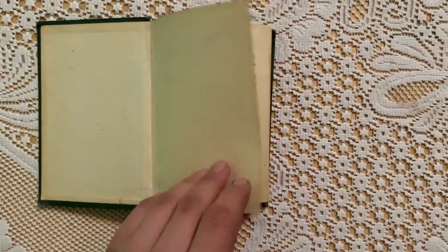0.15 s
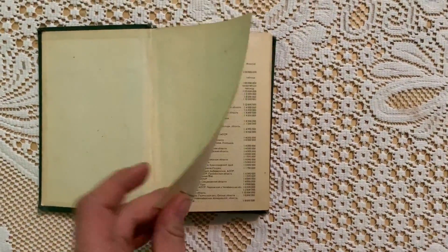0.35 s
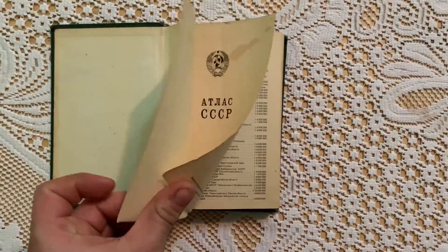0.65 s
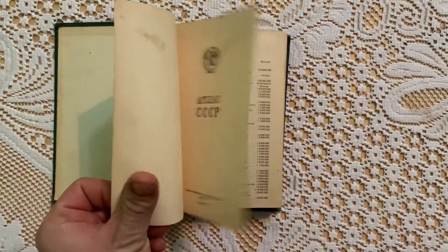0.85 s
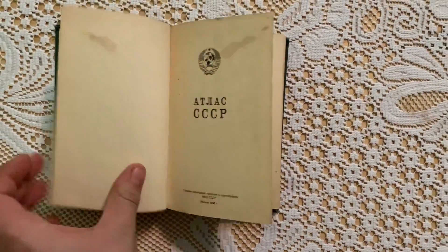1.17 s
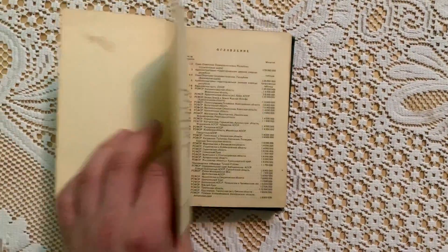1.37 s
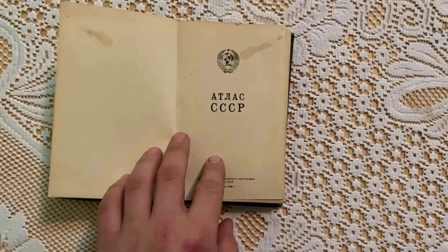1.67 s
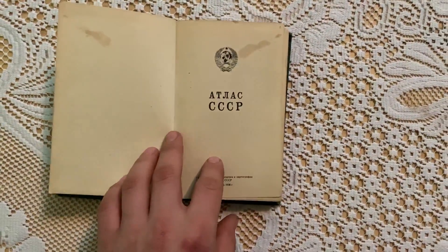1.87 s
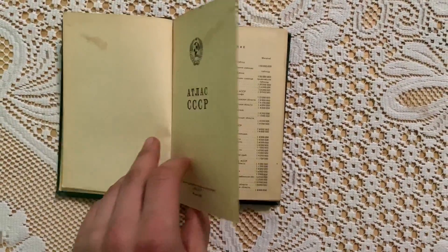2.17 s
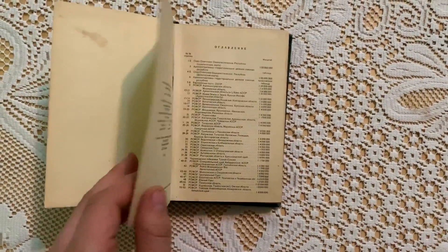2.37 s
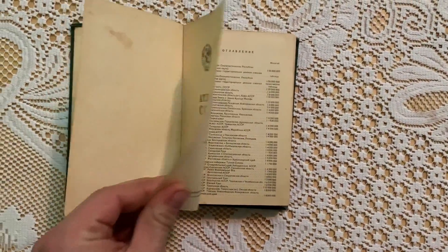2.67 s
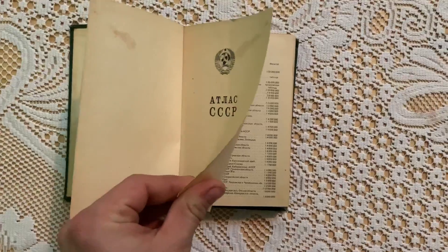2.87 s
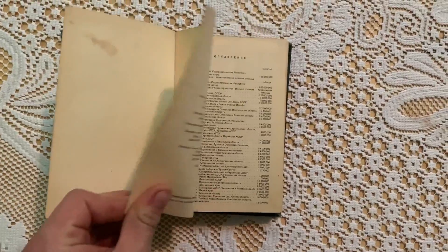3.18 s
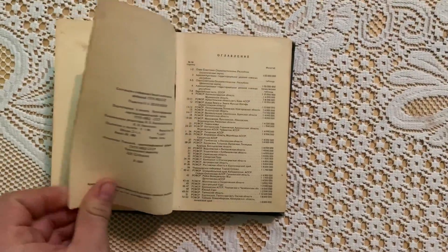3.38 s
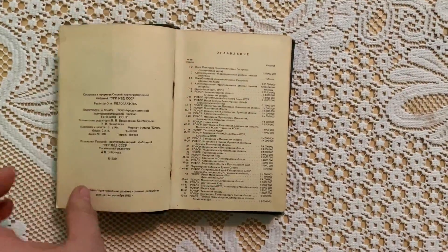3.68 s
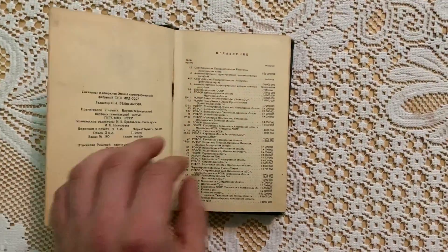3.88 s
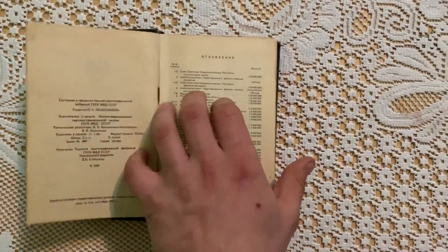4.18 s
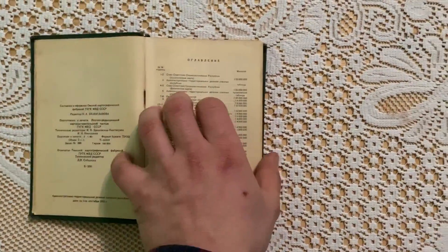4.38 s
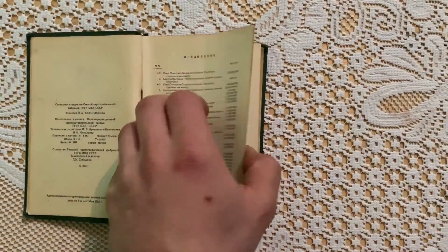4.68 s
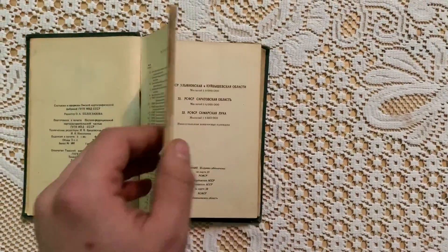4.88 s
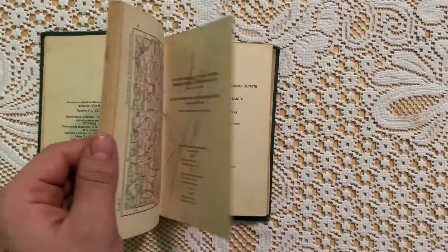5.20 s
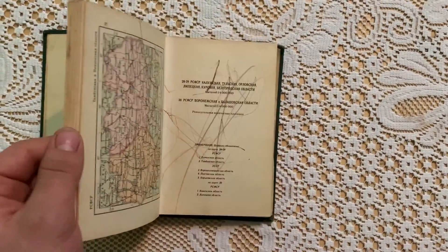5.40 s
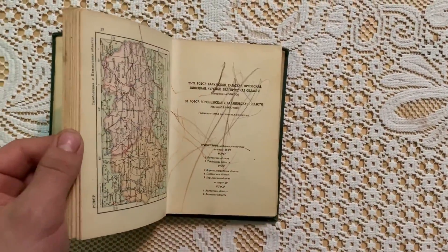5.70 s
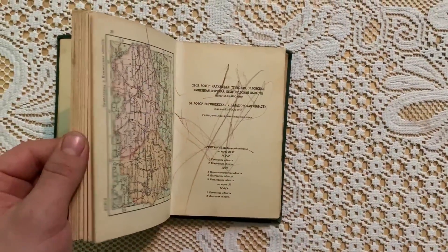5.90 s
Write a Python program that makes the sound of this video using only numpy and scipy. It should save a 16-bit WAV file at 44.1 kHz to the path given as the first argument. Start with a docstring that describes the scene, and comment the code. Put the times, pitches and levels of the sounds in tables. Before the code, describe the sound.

Stiff paper pages are turned by hand, heard through a close stereo microphone. Grainy sliding and hollow bending lead to sharp snaps around one and a half seconds, then a spaced run of crisp flicks near three. Soft bumps of the book on cloth sit underneath. The later part is nearly still, until thick pages flop over with a soft breathy thump and rustle. Short room reflections, faint low room air.

```python
"""A small room, a cloth-covered table: a hand turns the stiff pages of an old book close to a two-port microphone.
Sheets slide with a dry hiss of grainy noise, bend with a hollow crumple of small buckles and a ring of page modes,
and snap in short pulses with a flutter, a thud and a scrape. Sliding edges sing, creases crackle, the book bumps
on the cloth. At the end a bunch of pages fans over and pushes a puff of air at the microphone.
Around it lie sparse wall reflections and a faint bed of filtered noise, the air of the room."""
import sys
import numpy as np
from scipy import signal
from scipy.fft import rfft, irfft
from scipy.io import wavfile

SR = 44100
rng = np.random.default_rng(int(sys.argv[2]) if len(sys.argv) > 2 else 0)


def store_pcm(level_fs):
    """Save levels as 16-bit WAV."""
    pcm = np.round(np.clip(level_fs, -1, 1) * 32767).astype(np.int16)
    wavfile.write(sys.argv[1], SR, np.atleast_2d(pcm).T)


N = 266805
TIME = np.arange(N) / SR

# Event levels are relative: each layer is mixed with a gain of its own.
# Strokes of a sheet sliding on sheet or skin: first page, second page, then a bunch of pages lifted:
# (start [s], time to reach full speed [s], time it runs on [s], rub level [dB], fibre fizz level [dB])
SLIDES = [ (0.112, 0.0061, 0.0058, -53, -55), (0.255, 0.026, 0.011, -47, -43.5),
          (0.39, .04, 0.18, -58, -67.5), (0.473, 0.17, 0.062, -39.5, -40.5), (0.69, 0.23, .065, -46.5, -46),
          (0.91, 0.031, 0.018, -40, -44), (1.022, 0.023, 0.17, -51, -49.5),
          (1.235, 0.038, 0.012, -54.5, -48), (1.356, 0.16, 0.021, -50.5, -45.5),
          (1.485, 0.048, 0.059, -33, -56), (1.58, 0.069, 0.051, -49.5, -85),
          (1.909, 0.092, 0.078, -56, -59.5), (2.16, 0.085, 0.16, -61.5, -57.5),
          (2.35, 0.13, 0.048, -62, -55.5), (2.56, 0.056, 0.028, -48.5, -52.5),
          (2.66, 0.038, 0.69, -55, -59), (2.991, 0.019, 0.058, -50.5, -84), (3.119, 0.17, 0.31, -53.5, -62),
          (3.437, 0.013, 0.057, -49, -43.5), (3.5, 0.044, 0.084, -52.5, -53.5),
          (3.619, 0.013, 0.069, -49.5, -42), (3.814, 0.059, 0.0054, -56.5, -55.5),
          (3.951, 0.013, 0.0061, -57.5, -59.5), (4.06, 0.19, 0.065, -59, -67),
          (4.274, 0.052, 0.034, -56, -58.5), (4.656, 0.004, 0.058, -56.5, -57.5),
          (4.721, 0.083, 0.071, -60.5, -60.5), (4.87, 0.05, 0.19, -66, -70),
          (5.181, 0.047, 0.0049, -57.5, -56.5)]
# Paper snaps and taps: corner caught, buckle over the spine, slap flat, edge slipping off the thumb, crackle, grip:
# (time [s], crack level [dB], thud level [dB], edge scrape level [dB],
#  share of the crack in its first pulse [0-1], nominal centre of the crack [Hz])
SNAPS = [ (0.076, -25.5, -29.5, -24.5, 0.75, 1620), (0.249, -17.5, -26, -28.5, 0.45, 1140),
         (0.263, -15.5, -19, -26, 0.8, 1410), (0.2748, -13.5, -17, -24, 0.6, 1780),
         (0.319, -8, -20.5, -51, 0.46, 1480), (0.9462, -11, -16.5, -5, 0.3, 1940),
         (0.9535, -5, -38, -32, 0.4, 1420), (1.299, -18, -33.5, -26, 0.3, 1200),
         (1.4675, -9, -39.5, -23, 0.1, 1500), (1.482, -8, -27.5, -27, 0.16, 1550),
         (1.495, -10, -17, -26, 0.1, 1550), (1.5197, -11, -10.5, -13, 0.8, 1638),
         (1.5295, 1.5, -24, -33, 0.7, 2200), (1.5318, 5.5, -4, -6, 0.3, 2040),
         (1.5464, -0.5, -11.5, -18, 0.8, 1601), (1.5578, -9, -11, -24, 0.6, 1530),
         (1.5763, 1.5, -22, -37, 0.92, 1930), (1.6617, -16, -22.5, -60, 0.73, 1424),
         (2.18, -28.5, -34, -32.5, 0.67, 1680), (2.6563, -21.5, -24, -18.5, 0, 2550),
         (2.702, -11.5, -15.5, -12, 0.9, 1930), (2.7357, -8, -19, -7, 1, 2010),
         (2.7794, -10, -18, -9, 1, 1840), (2.8317, -4.5, -18.5, -8.5, 0.91, 2300),
         (2.889, -9, -22.5, -15, 0.78, 2330), (2.9974, 1.5, -15.5, -11, 0.95, 2200),
         (3.2013, -13, -37, -17.5, 0.35, 2700), (3.2367, -16.5, -25, -16.5, 0.3, 2500),
         (3.2663, -21, -26, -23, 0.4, 2520), (3.3081, -16.5, -21.5, -16, 0.5, 2610),
         (3.339, -12, -20, -11, 0.15, 2320), (3.3794, -16.5, -27.5, -40, 0.4, 1240),
         (3.4424, -22.5, -46, -19, 0.2, 2210), (3.8271, -29, -39, -55.5, 0, 1600),
         (4.2179, -24.5, -23, -25.5, 0.65, 1444), (4.2526, -25, -16, -56, 0.4, 1024),
         (4.5706, -33, -27, -40, 0.1, 1095), (4.659, -29.5, -38, -31.5, 0.47, 1300),
         (5.3173, -30.5, -42, -35, 0.07, 1695)]
# A sheet flexes as it is lifted or laid down: (start [s], length [s], level [dB])
BENDS = [(0.064, 0.072, -55.5), (0.228, 0.045, -45), (0.326, 0.41, -57.5), (0.93, 0.033, -34.5),
         (0.969, 0.065, -34), (1.007, 0.34, -49), (1.283, 0.05, -38), (1.448, .14, -33.5), (2.2, 0.19, -59),
         (2.588, 0.023, -48.5), (2.718, 0.3, -46), (3, 0.11, -48), (3.23, 0.58, -57.5), (3.345, 0.031, -49),
         (3.85, 0.016, -49.5), (4.218, 0.076, -50), (4.308, 0.018, -52)]
# Stiff paper crinkles while it is curled: (start [s], length [s], level [dB])
CRINKLES = [(0.581, 0.37, -58.5), (1.481, 0.081, -40.5), (2.627, 0.26, -54), (3.19, 0.14, -50.5),
            (3.424, 0.23, -56.5)]
# A sliding edge or fingertip sings in the gap under the sheet, which opens or closes:
# (start [s], length [s], from [Hz], to [Hz], level [dB])
SINGS = [(0.116, 0.017, 1640, 1630, -43), (0.49, 0.084, 7900, 6660, -51.5),
         (0.539, 0.13, 1840, 2380, -43.5), (0.708, 0.27, 7700, 7400, -50), (2.204, 0.033, 970, 875, -58),
         (2.277, 0.16, 497, 217, -60.5), (2.442, 0.41, 2240, 2830, -57.5), (3.38, 0.11, 900, 740, -65),
         (3.683, 0.048, 1250, 1780, -47.5), (3.863, 0.036, 1210, 1510, -57), (4.663, 0.29, 3280, 3940, -64),
         (4.857, 0.57, 6300, 7140, -68), (4.867, 0.065, 300, 357, -61.5), (5.017, 0.37, 2730, 2410, -67.5),
         (5.197, 0.05, 2310, 1790, -62), (5.331, 0.34, 2130, 2100, -70.5), (5.4, 0.25, 240, 401, -65)]
# Pages fanning over: (time [s], air push level [dB], swish level [dB])
FAN = [(5.82, -74, -97), (5.888, -51.5, -82), (5.954, -38, -37.5), (6.05, -45, -34)]
# The hand shifts the book on the cloth: (start [s], length [s], level [dB])
SHOVES = [(0.95, 0.2, -57), (1.293, 0.13, -57.5), (1.464, 0.05, -49.5), (2.626, 0.32, -53),
          (2.979, 0.073, -58), (3.162, 0.26, -54), (4.2, 0.23, -58.5)]

# Spectra of the sources, only their shape counts: (frequency [Hz], relative level [dB per Hz])
RUB_COLOUR = [(150, -21), (500, -34.5), (900, -10), (1400, -2.5), (2100, -2.5), (3000, -3.5), (4200, -6),
              (6000, -11), (10000, -46)]
FIZZ_COLOUR = [(2500, -47), (4500, 0.5), (6000, 1), (7400, 4.5), (9000, 2), (11000, 0), (13000, -3),
               (16000, -13)]
CRACK_COLOUR = [(100, -35), (400, -14), (750, -5.5), (1150, 4.5), (1900, 4.5), (2600, 2.5), (3600, -3),
                (4700, -9.5), (6500, -16.5), (15000, -42)]
THUD_COLOUR = [(25, -29), (70, 3), (160, -15.5), (330, -0.5), (600, -5.5), (1000, -11.5), (7000, -70.5)]
SCRAPE_COLOUR = [(2000, -36), (4200, 7.5), (6200, 2), (9000, 2.5), (12500, 5), (16000, -13)]
BEND_COLOUR = [(30, -35), (70, -23), (150, -10), (320, -11.5), (550, -7.5), (1000, 1.5), (1450, -2.5),
               (2000, -6.5), (3300, -25), (6000, -30.5), (14000, -34)]
CRINKLE_COLOUR = [(200, -10.5), (700, 7), (2400, 1.5), (5000, 12), (12000, -2), (16000, -20.5)]
PUFF_COLOUR = [(20, -17), (55, -1), (120, -2.5), (260, -4.5), (400, -17), (600, -15), (1000, -23.5),
               (10000, -72)]
SWISH_COLOUR = [(400, -28), (1300, -6.5), (2100, -2.5), (4300, 1), (5400, -2), (6700, -11), (8500, -18.5),
                (14000, -33)]
HANDLING_COLOUR = [(25, -40.0), (120, 0.5), (230, 4.5), (320, -6.5), (450, -11.0), (650, -12.5),
                   (1000, -41.0), (4000, -68)]
# Spectra of nearby scattering and of the room's air: (frequency [Hz], relative level [dB per Hz])
NEARBY_COLOUR = [(100, -12), (600, -4), (1500, -3), (3300, -2), (4300, -6), (5500, -13), (16000, -15)]
AIR_COLOUR = [(22, -38), (45, 9), (77, -9), (160, -12), (350, -19.5), (750, -46.5), (2200, -40.5),
              (4800, -35.5), (10000, -40.5), (16000, -41.5)]

# Resonances of the arched page: (frequency [Hz], relative level [dB])
PAGE_MODES = [(464, -0.5), (700, 2), (840, 1), (1030, 5), (1240, -13)]
# Steady lines of the rubbing edges of a bunch: (frequency [Hz], relative level [dB])
FAN_MODES = [(2304, -5), (2837, -1), (3219, -5), (3698, -4), (4231, -6), (4743, -6), (5136, -13),
             (6078, -9), (6761, -9), (7671, -14)]
# Resonances of the block of pages: (frequency [Hz], relative level [dB])
THUMP_MODES = [(115, -2.5), (227, -2), (404, -7.5)]

# Decay of the room: (frequency [Hz], time to fall 60 dB [s])
ROOM_DECAY = [(100, 0.36), (400, 0.31), (1500, 0.11), (4000, 0.17), (8000, 0.062), (15000, 0.097)]
# Phase between the two microphone ports: (frequency [Hz], lead of the left port [rad])
PORT_PHASE = [(0, 0), (500, -.15), (2100, -.45), (3050, -2), (3400, -4.2), (3700, -4.7), (4200, -3.8),
              (5100, -3.1), (7700, -.1), (9000, .1), (12100, 3.1), (13300, 3.3), (15500, 6.2)]
# Level between the two microphone ports: (frequency [Hz], left minus right [dB])
PORT_BALANCE = [(40, 2.5), (150, -4.5), (1000, -1.5), (2600, -3.5), (3700, 2), (5000, 1)]

# A movement sags while it runs, then dies away; releases are in s per 20 dB, before the coast is added.
SLIDE_SAG_DB, SLIDE_RELEASE_S = 5, 0.025
BEND_ATTACK_S, BEND_SAG_DB, BEND_RELEASE_S = 0.029, 18.5, 0.12
RING_SAG_DB = 14  # the ring of the page eases off less than its crumple
SHOVE_ATTACK_S, SHOVE_SAG_DB, SHOVE_RELEASE_S = 0.042, 16, 0.09
COAST_SHARE = 0.55  # slow starts stop slowly: this share of the rise is added to the release
TOUCH_RUB_DB, TOUCH_FIZZ_DB = -73.5, -79.5  # fingers resting on the paper
DRAG_FLEX_DB = -22  # a sliding sheet flexes a little too, relative to its rub
HOLD_DB = -70.5  # the hand just holding the book
SING_WIDTH_HZ, SING_WIDTH_SHARE = 200, 0.16  # width of each resonance: a base plus a share of its pitch
AIR_DB = -66
EDGE_HZ = 16000  # upper band limit


def sliding():
    """The same fibre slips sound the sheet as a rub and the fibres as a fizz."""
    rub_level, fizz_level = slide_levels()
    slips = friction(per_s=1500, spread_db=3.2, grainy=0.75) * waver(rate_hz=45, depth_db=1.7)
    rub = gain_of(-0.5) * colour(slips * rub_level, RUB_COLOUR)
    fizz = gain_of(-0.2) * colour(slips * fizz_level, FIZZ_COLOUR)
    # the space under the lifted page keeps changing and makes the colour drift
    gap_hz = 1000 * waver(rate_hz=4, depth_db=2)
    return between_sheets(rub + fizz, gap_hz, echo=.4)


def slide_levels():
    """Rub and fizz follow the same strokes, over the light touch of the fingers."""
    rub_rows = [(s, rise, run, db) for s, rise, run, db, _ in SLIDES]
    fizz_rows = [(s, rise, run, db) for s, rise, run, _, db in SLIDES]
    rub = strokes(rub_rows, SLIDE_SAG_DB, SLIDE_RELEASE_S)
    fizz = strokes(fizz_rows, SLIDE_SAG_DB, SLIDE_RELEASE_S)
    return np.hypot(rub, gain_of(TOUCH_RUB_DB)), np.hypot(fizz, gain_of(TOUCH_FIZZ_DB))


def snapping(flutter_s=0.006, thud_s=0.012, scrape_s=0.0085, tick_share=0.082, usual_hz=1950):
    """A buckle gives one sharp pulse; the sheet flutters, thuds on the book, and its edge scrapes briefly."""
    t = np.arange(SR // 12) / SR
    cracks, thuds, scrapes = np.zeros((3, N))
    pulse = 1. * (t == 0)
    for s, crack_db, thud_db, scrape_db, sharp, hz in SNAPS:
        flutter_noise, thud_noise, scrape_noise = rng.standard_normal((3, len(t)))
        sharp = np.clip(sharp, 0, 1)
        tick = np.clip(sharp * tick_share, 0, 1)
        # a wide, slack buckle sounds lower than a small, taut one
        tone = np.array(CRACK_COLOUR) * [hz / usual_hz, 1]
        flutter = unit(colour(flutter_noise * np.exp(-t / flutter_s), tone))
        crack = np.sqrt(sharp) * colour(pulse, tone) + np.sqrt(1 - sharp) * flutter
        add(cracks, s, gain_of(crack_db) * crack)
        add(thuds, s, gain_of(thud_db) * unit(thud_noise * np.exp(-t / thud_s)))
        scrape = unit(scrape_noise / (1 + (t / scrape_s) ** 8))
        edge = np.sqrt(tick) * pulse + np.sqrt(1 - tick) * scrape
        # each time the edge is at another height over the book, which colours its scrape
        edge = between_sheets(edge, rng.uniform(1300, 3200), echo=.42)
        add(scrapes, s, gain_of(scrape_db) * edge)
    return (gain_of(0.65) * cracks + colour(thuds, THUD_COLOUR)
            + gain_of(-0.15) * colour(scrapes, SCRAPE_COLOUR))


def bending():
    """A flexing sheet gives way in small buckles; the hollow ring of the page outlasts their crumple."""
    buckles = friction(per_s=600, spread_db=4, grainy=0.92) * waver(rate_hz=45, depth_db=2.2)
    crumple = gain_of(-3.0) * colour(buckles * strain(BEND_SAG_DB), BEND_COLOUR)
    body = gain_of(-11.5) * ring(buckles * strain(RING_SAG_DB), PAGE_MODES, width_hz=68)
    gap_hz = 400 * waver(rate_hz=5, depth_db=2.5)
    return between_sheets(crumple, gap_hz, echo=.35) + body


def strain(sag_db):
    """How hard the sheet flexes: in each bend, and slightly whenever it is dragged."""
    rows = [(s, BEND_ATTACK_S, length, db) for s, length, db in BENDS]
    bends = strokes(rows, sag_db, BEND_RELEASE_S)
    return np.hypot(bends, gain_of(DRAG_FLEX_DB) * slide_levels()[0])


def crinkling():
    """Tiny creases give way one by one in the curled sheet."""
    rows = [(s, .01, length, db) for s, length, db in CRINKLES]
    curl = strokes(rows, sag_db=8.5, release_s=0.026)
    creases = friction(per_s=170, spread_db=4.5, grainy=1)
    return colour(creases * curl, CRINKLE_COLOUR)


def singing():
    """The noise of a sliding edge rings one gliding resonance, swelling and fading with the stroke."""
    out = np.zeros(N)
    for start, length, from_hz, to_hz, db in SINGS:
        u = np.linspace(0, 1, round(max(length, .01) * SR))  # progress through the stroke
        hz = from_hz + (to_hz - from_hz) * u
        width_hz = SING_WIDTH_HZ + SING_WIDTH_SHARE * from_hz
        note = rng.standard_normal(len(u))
        for _ in range(2):  # two equal resonances in a row
            note = resonate(note, hz, width_hz)
        add(out, start, gain_of(db) * np.sin(np.pi * u) * evened(note))
    return out


def fanning():
    """Falling pages push air at the microphone and thump the block; their edges rub and buzz on steady lines."""
    start, out = FAN[0][0], np.zeros(N)
    during = TIME >= start
    push, swish = np.array(levels(FAN))[:, during]
    gust, slips = rng.standard_normal((2, len(push))) * [push, swish]
    puff = gain_of(-2.5) * colour(gust, PUFF_COLOUR)[:len(gust)]
    thump = gain_of(-6.0) * ring(gust, THUMP_MODES, width_hz=41)[:len(gust)]
    lines = np.zeros(N)
    for hz, db in FAN_MODES:
        line = np.sin(2 * np.pi * (hz * TIME + rng.random()))
        lines += gain_of(db) * line * waver(rate_hz=30, depth_db=3)
    buzz = gain_of(-10) * swish * evened(lines[during])
    rustle = between_sheets(colour(slips, SWISH_COLOUR), gap_hz=470, echo=.5, count=8)
    for part in (puff + thump, gain_of(-8.0) * rustle, buzz):
        add(out, start, part)
    return out


def handling():
    """Soft, uneven bumps of the hand and the binding on the cloth."""
    bumps = friction(per_s=30, spread_db=2.5, grainy=0.75) * pressure()
    return gain_of(1.5) * colour(bumps, HANDLING_COLOUR)


def pressure():
    """How hard the hand works the book: shoves over a steady hold."""
    rows = [(s, SHOVE_ATTACK_S, length, db) for s, length, db in SHOVES]
    shoves = strokes(rows, SHOVE_SAG_DB, SHOVE_RELEASE_S)
    return np.hypot(shoves, gain_of(HOLD_DB))


def rustling():
    """All the sounds of the paper and the hand except the snaps."""
    return sliding() + singing() + crinkling() + bending() + handling() + fanning()


def strokes(rows, sag_db, release_s):
    """Gain curve of movements (start, rise, run, dB): each gathers speed, sags while it runs, then dies away."""
    power = np.zeros(N)
    for start, rise, run, db in rows:
        rise, run = max(rise, .002), max(run, .002)
        stop_s = release_s + COAST_SHARE * rise
        t = np.arange(0, rise + run + 3 * stop_s, 1 / SR)
        speed = np.sin(np.pi / 2 * np.minimum(t / rise, 1)) ** 2
        sag = sag_db * np.clip((t - rise) / run, 0, 1)
        release = 20 * np.maximum(t - rise - run, 0) / stop_s
        add(power, start, (speed * gain_of(db - sag - release)) ** 2)
    return np.sqrt(power)


def friction(per_s, spread_db, grainy):
    """Fibres catch and let go: tiny slips of uneven size over a smooth hiss."""
    at, slips = np.flatnonzero(rng.random(N) < per_s / SR), np.zeros(N)
    sizes = gain_of(spread_db * np.minimum(rng.exponential(1, N)[at], 3))
    slips[at] = np.sign(rng.random(N)[at] - .5) * sizes
    share = np.clip(grainy, 0, 1)  # of the power
    return np.sqrt(share) * evened(slips) + np.sqrt(1 - share) * rng.standard_normal(N)


def waver(rate_hz, depth_db, size=128):
    """A random gain of rms 1 that wanders mostly below rate_hz."""
    t = TIME[::size]
    spectrum = rfft(rng.standard_normal(len(t)))
    slow = irfft(spectrum / (1 + (np.fft.rfftfreq(len(t), size / SR) / rate_hz) ** 4), len(t))
    return np.interp(TIME, t, evened(gain_of(depth_db * evened(slow))))


def between_sheets(x, gap_hz, echo, count=4):
    """Sound bounces in the gap between two sheets and rings at the multiples of gap_hz, which may move."""
    echo, t = np.clip(echo, 0, .8), TIME[:len(x)]
    bounces = sum(echo ** k * np.interp(t - k / gap_hz, t, x) for k in range(count))
    return np.sqrt(1 - echo ** 2) * bounces


def resonate(x, hz, width_hz):
    """A resonance of gain 1 whose pitch may move: shift it to 0 Hz, smooth, shift back."""
    turn = np.exp(2j * np.pi * np.cumsum(hz * np.ones(len(x))) / SR)
    r = np.exp(-np.pi * width_hz / SR)
    return 2 * (turn * signal.lfilter([1 - r], [1, -r], x / turn + 1e-18)).real


def ring(x, modes, width_hz):
    """Rings a set of decaying modes; white noise keeps its power."""
    t = np.arange(SR // 6) / SR
    tones = sum(gain_of(db) * np.sin(2 * np.pi * hz * t) for hz, db in modes)
    return signal.oaconvolve(x, unit(tones * np.exp(-np.pi * width_hz * t)))[:N]


def colour(x, points, size=4096):
    """Causal minimum-phase filter with the given spectrum; white noise keeps its power."""
    log_gain = np.log(gain_of(read(points, abs(np.fft.fftfreq(size, 1 / SR)))))
    taps = np.fft.ifft(np.exp(np.conj(signal.hilbert(log_gain)))).real[:size // 2]
    return signal.oaconvolve(x, unit(taps))[:N]


def gain_of(db):
    """Decibels to amplitude."""
    return 10 ** (np.asarray(db) / 20)


def evened(x):
    """Scales to rms 1."""
    return x / np.sqrt(np.mean(x ** 2) + 1e-20)


def unit(x):
    """Scales to energy 1."""
    return x / (np.linalg.norm(x) + 1e-20)


def read(points, hz):
    """Reads a table along a log-frequency axis."""
    f, value = np.transpose(points)
    return np.interp(np.log(hz + 1), np.log(f + 1), value)


def levels(rows):
    """One gain curve for each dB column of a table."""
    s, *columns = np.transpose(rows)
    return [gain_of(np.interp(TIME, s, c)) for c in columns]


def add(mix, s, sound):
    """Mixes a sound in at time s."""
    part = mix[max(round(s * SR), 0):][:len(sound)]
    part += sound[:len(part)]


def ports(x):
    """Sound reaches the two microphone ports with a phase difference."""
    turn = np.exp(.5j * read(PORT_PHASE, np.fft.rfftfreq(N, 1 / SR)))
    return irfft(rfft(x) * np.array([turn, 1 / turn]), N)


def scatter(x, spread_s=0.0029):
    """Table, hand and raised sheet scatter the sound within milliseconds, differently to each port."""
    t = np.arange(SR // 50) / SR
    fade = np.exp(-t / spread_s)
    paths = [unit(colour(rng.standard_normal(len(t)) * fade, NEARBY_COLOUR)) for _ in range(2)]
    return signal.fftconvolve(x[None], np.array(paths), axes=1)[:, :N]


def room(x, apart_hz=(500, 4500), gap_s=0.001):
    """Sparse reflections, each band dying at its own speed; mainly the middle range is spread between the ports."""
    shape = (2, SR // 2)
    taps = rng.choice([-1., 1.], shape) * (rng.random(shape) < 3000 / SR)  # 3000 reflections per s
    taps = taps * (np.arange(SR // 2) > gap_s * SR)
    hz, t, z = signal.stft(taps, SR, nperseg=256)
    z = z * gain_of(-60 * t / read(ROOM_DECAY, hz)[:, None])
    z[1] *= (hz / (hz + apart_hz[0]) / (1 + (hz / apart_hz[1]) ** 8))[:, None]
    tails = signal.istft(z, SR, nperseg=256)[1]
    mid, side = signal.fftconvolve(x[None], unit(tails), axes=1)[:, :N]
    return ports(mid) + np.array([side, -side])


def air():
    """The low rumble and faint hiss of the quiet room: noise shared by the ports, plus a little of each port's own."""
    shared, left, right = (colour(rng.standard_normal(N), AIR_COLOUR) for _ in range(3))
    apart = gain_of(-10) * np.array([left, right])
    return gain_of(AIR_DB) * (ports(shared) + apart)


def scene():
    """Paper sounds, direct, scattered nearby and off the walls, over the room's air."""
    rustle, snaps = rustling(), snapping()
    # the far parts of a sheet rustle on their own, differently for each port
    far_parts = np.array([colour(sliding() + bending(), NEARBY_COLOUR) for _ in range(2)])
    near = gain_of(-15) * far_parts + gain_of(-16) * scatter(snaps)
    walls = room(gain_of(-11.5) * rustle + gain_of(-15.0) * snaps)
    direct = ports(gain_of(-5.5) * rustle + gain_of(-5.0) * snaps)
    return direct + near + walls + air()


def record(dry):
    """The microphone: level balance between its ports by frequency, then the upper band limit."""
    lean_db = read(PORT_BALANCE, np.fft.rfftfreq(N, 1 / SR)) / 2
    heard = irfft(rfft(dry) * gain_of([lean_db, -lean_db]), N)
    band_limit = signal.firwin(511, EDGE_HZ, window=("kaiser", 9), fs=SR)
    return signal.oaconvolve(heard, band_limit[None], "same")


dry = scene()
out = record(dry)
store_pcm(out)
```